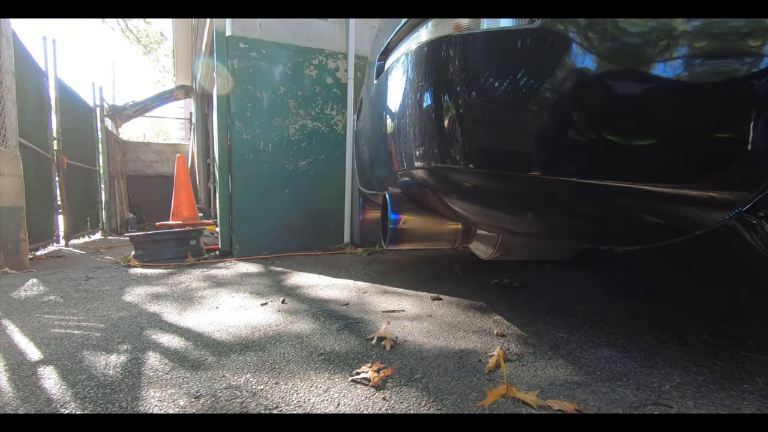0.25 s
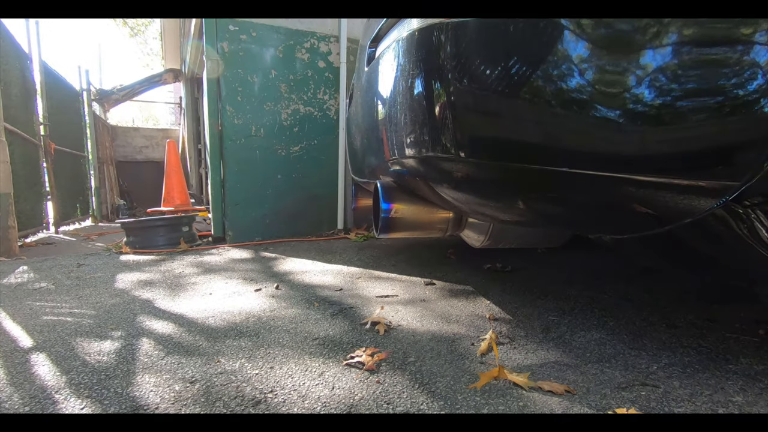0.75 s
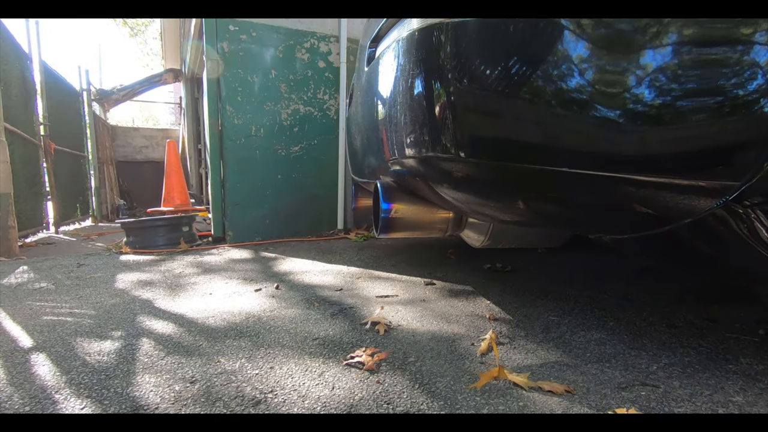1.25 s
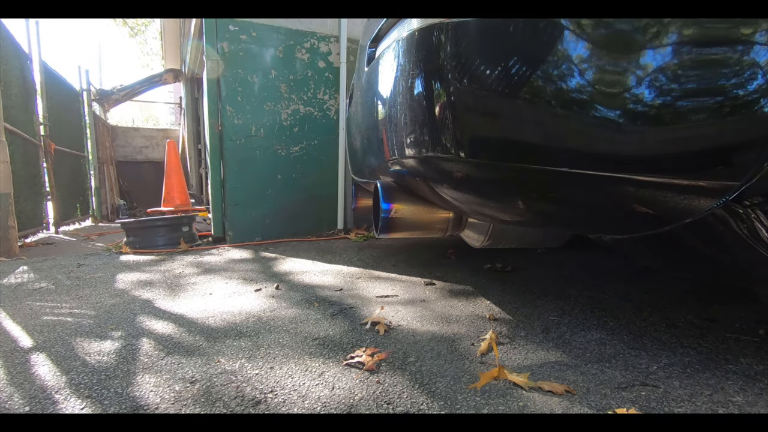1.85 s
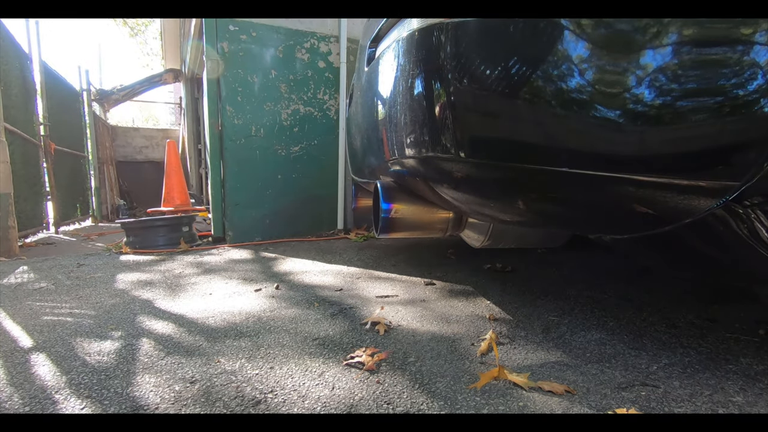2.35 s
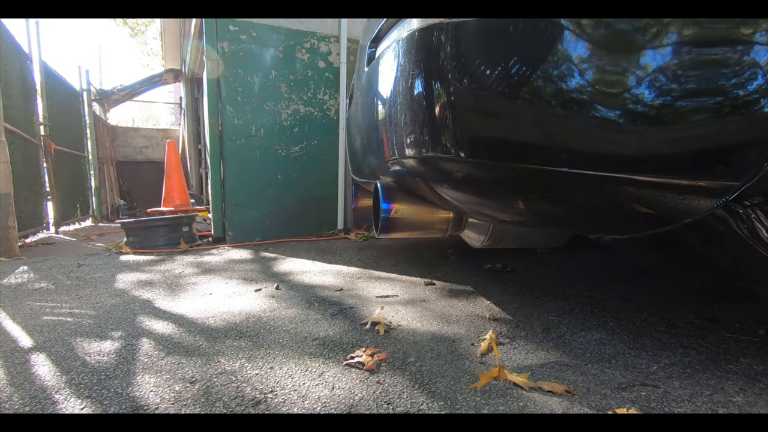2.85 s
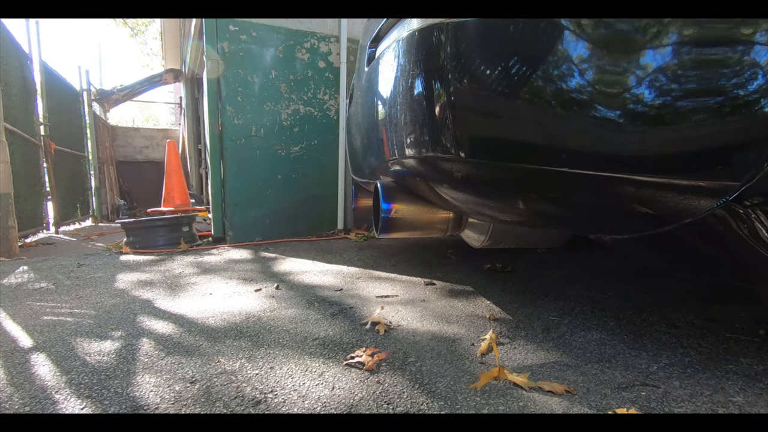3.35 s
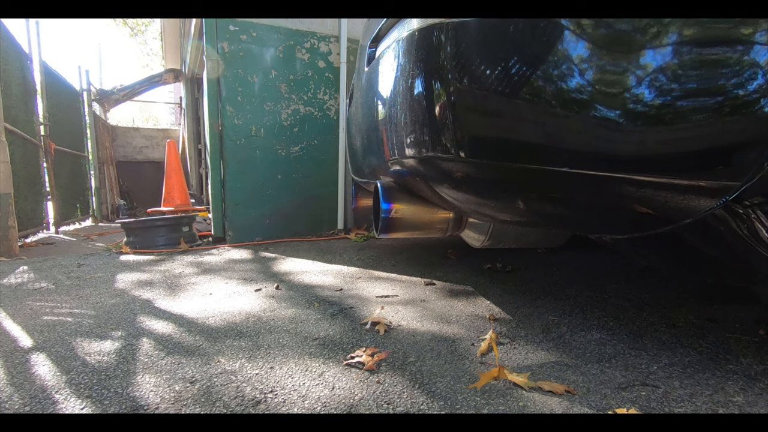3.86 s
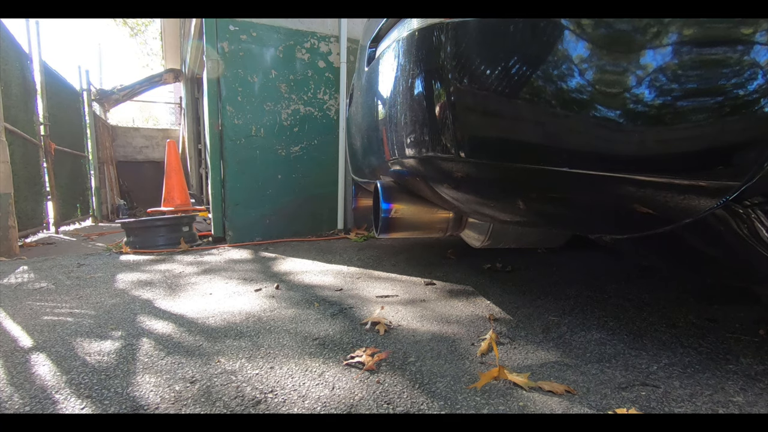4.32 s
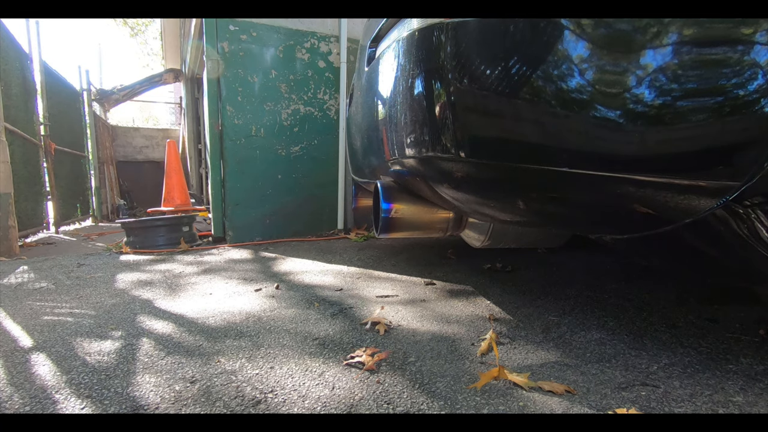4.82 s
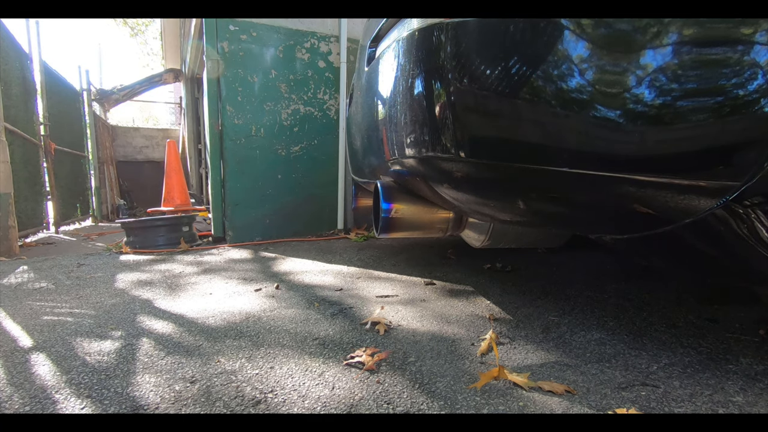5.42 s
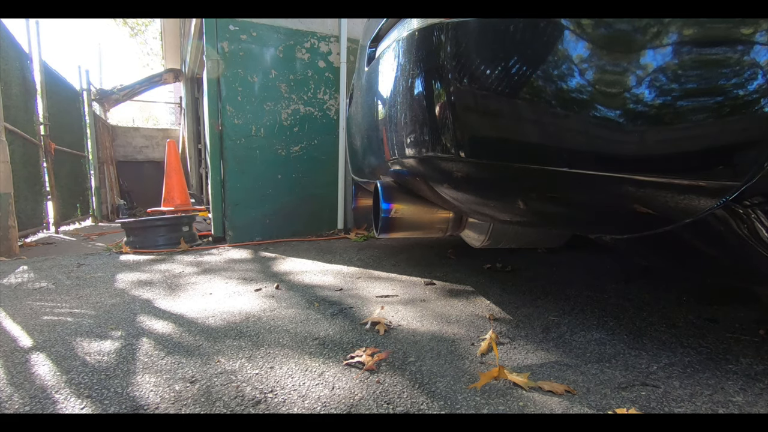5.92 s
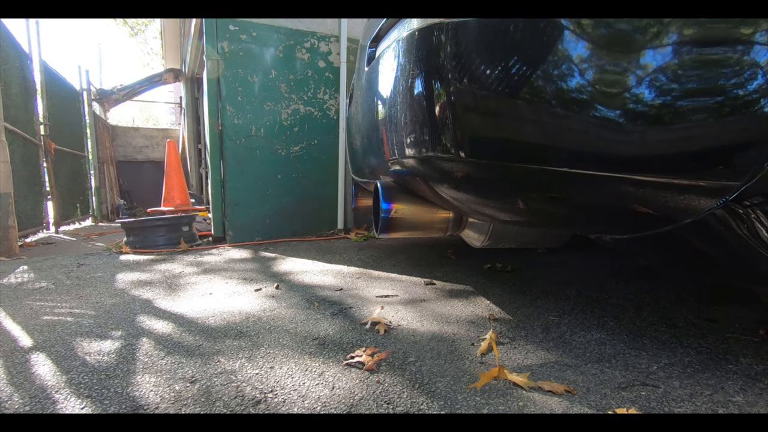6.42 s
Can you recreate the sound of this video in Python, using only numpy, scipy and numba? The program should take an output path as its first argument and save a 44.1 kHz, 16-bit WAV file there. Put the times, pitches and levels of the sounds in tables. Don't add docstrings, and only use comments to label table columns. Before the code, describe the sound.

After quiet road rumble, a cold car cranks briefly, fires with a thump and idles fast and uneven, heard right beside the tailpipe.

```python
import sys
import numpy as np
from scipy import signal
from scipy.fft import rfft, irfft, next_fast_len
from scipy.io import wavfile
from scipy.ndimage import uniform_filter1d
from numba import njit

SR = 44100
rng = np.random.default_rng(int(sys.argv[2]) if len(sys.argv) > 2 else 0)


def gain_from_decibels(decibels):
    exponent = np.asarray(decibels, float) / 20
    return 10 ** exponent


def generate_wav(signal):
    frames = np.transpose(np.atleast_2d(signal))
    scaled = np.clip(frames, -1, 1) * 32767
    pcm = np.round(scaled).astype(np.int16)
    wavfile.write(sys.argv[1], SR, pcm)


N = 294588
T = np.arange(N) / SR
HZ = np.fft.rfftfreq(next_fast_len(N), 1 / SR)

# (frequency [Hz], density [dB/Hz])
WIND_MODE_COLOUR = [(12, -49), (30, -13.5), (106, -3), (150, -9), (200, -15), (235, -17), (300, -16),
                    (767, -15), (1500, -17.5), (2300, -27.5), (3300, -38), (6000, -46.5), (6900, -61),
                    (9500, -78.5)]
STEREO_MODE_COLOUR = [(12, -45), (43, -8), (64, 0.5), (124, -7.5), (216, -17.5), (486, -26.5), (800, -24.5),
                      (1640, -25), (3500, -39), (4300, -48), (6400, -50), (7600, -55.5), (8300, -65.5),
                      (11000, -82.5)]
# (frequency [Hz], density [dB/Hz])
AIR_COLOUR = [(7000, -70), (8800, -30), (10000, -32.5), (13000, -41), (15700, -58)]
# (time [s], level [dB])
DUCK = [(2.45, -4), (2.6, -2), (3.3, -7.5), (3.45, -10.5), (6.68, -14)]
# (frequency [Hz], left minus right [dB])
YARD_BALANCE = [(60, 6.5), (100, 1), (180, 2.5), (310, -1), (530, -1.0), (920, -3.5), (1590, 0.5),
                (2740, 0.5), (4720, 2.5), (8150, 4.5)]
# (frequency [Hz], likeness [0-1])
YARD_LIKENESS = [(60, 1), (120, 0.97), (240, 0.86), (490, 0.73), (990, 0.21), (2000, 0.26), (4040, 0.54),
                 (8150, 0.08)]
# (time [s], depth [dB], half length [s])
LORRIES = [
    (0.48, 6.5, 0.074),
    (1.82, 2, 0.11),
    (1.93, -4.5, 0.044),
    (2.07, 1.5, 0.1),
    (2.363, -2, 0.19),
]
# (time [s], peak [dB], frequency [Hz], t60 [s])
TICKS = [(.705, -57, 7600, .03), (.785, -56, 8050, .0007), (2.497, -26, 2480, 0.018),
         (2.527, -16, 1290, 0.025), (3.37, -15, 63, .25), (3.434, -11.5, 54.3, .3),
         (3.448, -23, 343, 0.078), (3.481, -19, 445, 0.1), (3.452, -16, 201.7, 0.08),
         (3.468, -19, 184, 0.11), (3.486, -10, 212, 0.058), (3.521, -14, 194, 0.057)]
# (frequency [Hz], left minus right [dB])
CAR_BALANCE = [(60, 3.5), (100, 3.5), (180, 4), (310, 2), (530, -3.5), (920, -17), (1590, -18.5),
               (2740, -12.5), (4720, -8.5), (8150, 0)]
# (frequency [Hz], left lead [rad])
CAR_PHASE = [(0, 0), (300, -.1), (600, -.7), (860, -2.8), (1290, -4.4), (1950, -5.4), (3200, -5.5),
             (4480, -6.5), (5050, -8.4), (8350, -9.6)]
# (start [s], length [s], gear noise [dB], motor hum [dB], pumped air [dB])
STROKES = [
    (2.491, 0.092, -32.5, -24, -25),
    (2.691, 0.13, -32.5, -25, -23.5),
    (2.912, 0.079, -32.5, -26, -27.5),
    (3.062, 0.067, -31.5, -27, -26),
    (3.197, 0.061, -31.5, -24, -21),
]
# (time [s], hum [Hz])
MOTOR_HUM = [(2.5, 190.3), (2.62, 184.4), (2.72, 247.6), (2.8, 230.7), (2.86, 207.2), (2.94, 244.3),
             (3.05, 218), (3.12, 253.1), (3.3, 235.3)]
# (frequency [Hz], density [dB/Hz])
STARTER_COLOUR = [(180, -23), (300, 4), (414, -9), (484, -2), (706, -3.5), (1270, -3), (1620, -9.5),
                  (1860, -4), (2200, -10), (3260, -8.5), (4970, -28), (6400, -21), (8600, -36),
                  (11200, -71), (18900, -120)]
# (frequency [Hz], width [Hz], level [dB])
BELL_HOUSING = [(477, 23, 1), (1300, 62, -1.5), (1940, 47, -1.5), (2314, 47, -6.5), (2743, 62, -11),
                (2840, 20, -8), (3166, 50, -6), (3584, 36, -9.5), (4090, 64, -18)]
# (multiple of the hum [1], level against gear noise [dB])
WHINE = [(2, -13), (4, -13), (5.4, -14), (8, -14)]
# (start [s], end [s], frequency [Hz], level [dB])
FREEWHEEL = [
    (3.298, 3.464, 3940, -57),
    (3.52, 3.715, 4100, -57),
]
# (time [s], firings counted [1])
CRANK = [(3.348, -2), (3.516, 4), (3.639, 8), (3.99, 20), (4.356, 32), (4.7, 43), (5.313, 63), (6.155, 91),
         (6.763, 111)]
# (frequency [Hz], density [dB/Hz])
BAY_COLOUR = [(320, -15), (550, -2), (589, -11), (823, -18.5), (966, -10.5), (1150, -13), (1330, -9),
              (1620, -17.5), (1780, -11), (2040, -16), (2750, -12.5), (4310, -24.5), (6380, -16),
              (8600, -27.5), (11200, -63.5), (18900, -120)]
# (frequency [Hz], width [Hz], level [dB])
WHISTLE = [(1304, 39, 0.5), (1366, 54, -1.5), (1310, 180, -4.5)]
# (time [s], level [dB])
DRAUGHT = [(3.3, -49), (3.6, -54), (4.1, -42.5), (5.4, -40.5), (5.8, -46), (6.68, -46)]
# (lateness on the beat [s], size [1], rasp sharpness [dB])
CYLINDERS = [
    (-.0009, 1., 0),
    (-.0009, .97, 0),
    (-.0147, 1., -5),
    (-.0147, .69, -11),
]
STUMBLES = [
    (6, .4),
    (33, .4),
    (37, .5),
]
# (frequency [Hz], width [Hz], long-header gain [1], short-header gain [1])
PIPE_MODES = [(36.8, 19.3, -.92, -2.07), (59.5, 8., 2.29, 2.94), (80.8, 15.3, 6.42, 4.64),
              (101.5, 8., -6.55, -9.49), (131.4, 10.8, -1.05, -.47), (156.5, 8., -2.65, -1.21),
              (186.8, 16.3, .08, .79), (222.1, 8., 1.06, .48)]
# (frequency [Hz], width [Hz], level [dB])
SILENCER_MODES = [(167.3, 29.3, -2), (207.5, 21.5, 5), (329.4, 23.8, -1.5), (391.5, 19.4, 0.5),
                  (461.6, 68, -3)]
# (time [s], depth [dB], half length [s])
CHOKES = [
    (3.593, -15, 0.014),
    (3.942, -2, 0.017),
    (4.388, -4, 0.012),
    (4.516, -11.5, 0.018),
]

SWITCH_S = .785
WASH_DB, WASH_RISE_DB_S, NEAR_WASH_DB = -42.5, 6.5, -35.5
RUMBLE_DB, LEAVES_DB, NEAR_LEAVES_DB = 10, -57, -55
RUSTLE_S, RUSTLE_LENGTH_S, RUSTLE_DB = 0.14, .17, 5

COAST_GEAR_DB, COAST_HUM_DB, COAST_AIR_DB = -42, -35, -29
STRAIN_DB, STRAIN_UNTIL_S, STRAIN_FADES_S = 3.5, 2.72, .06
SPIN_UP_DB, SPIN_UP_S = -17.5, .035
BITE_S, EASE_S, HUM_BUILDS_S, HUM_EASES_S = 0.0014, 0.054, 0.033, .045
AIR_LAG_S, AIR_HALF_S = .02, 0.048
SIZZLE_DB, SIZZLE_FOLLOWS, CLASH_DB, CLASH_FADES_S = -48.5, .35, 10, .04
RELEASE_S, RELEASE_DB, RELEASE_HALF_S = 4.3, -31.5, .08

BAY_DB, WARMING_DB_S = -46.3, -0.76
OIL_FROM_S, OIL_ARRIVES_S, DRY_CLATTER_DB, DRY_TOP_DB = 3.47, .17, 10.5, 1.5
BANG_DUCK_DB, DUCK_S, DUCK_HALF_S = -3.5, 3.515, .03

STRONG_PAIR_MOVES = 34
BOOM_DB, RASP_DB = -15, -36
CATCH_S, SURGE_DB, SURGE_FADES_S = 3.37, 0.5, .4
FLARE_S, FLARE_DB, FLARE_HALF_S = 3.2, 16.5, 0.047


def unit(x):
    return x / np.sqrt(np.mean(x ** 2))


def columns(table):
    s, *rest = np.transpose(table)
    return [np.interp(T, s, c) for c in rest]


def over_hz(table, hz):
    f, v = np.transpose(table)
    return np.interp(np.log(hz + 1), np.log(f + 1), v)


def bump(at_s, half_s):
    return np.exp(-((T - at_s) / half_s) ** 2)


def swell(start_s, length_s, attack_s, release_s):
    rise = (T - start_s) / attack_s
    fall = 1 + (start_s + length_s - T) / release_s
    return np.clip(np.minimum(rise, fall), 0, 1)


def fading(start_s, fades_s):
    return np.exp(-np.maximum(T - start_s, 0) / fades_s)


def walk(rate_hz):
    k = int(SR / rate_hz)
    held = np.repeat(rng.standard_normal(N // k + 1), k)
    return 0.93 * uniform_filter1d(uniform_filter1d(held, k), k)[:N]


def through(x, gain):
    size = next_fast_len(N)
    return irfft(rfft(x, size) * gain, size)[:N]


def band(x, lo_hz, hi_hz):
    def below(hz):
        return 1 / (1 + (HZ / hz) ** 8)
    return through(x, below(hi_hz) - below(lo_hz))


@njit
def svf(x, hz, width):
    y, b, l = np.empty(len(x)), 0., 0.
    for i in range(len(x)):
        g = np.pi * hz[i] * (1 + (np.pi * hz[i]) ** 2 / 3)
        k = width / hz[i]
        v = (b + g * (x[i] - l)) / (1 + g * (g + k))
        b, l, y[i] = 2 * v - b, l + 2 * g * v, k * v
    return y


def ring(x, hz, width_hz):
    return svf(x, np.zeros(N) + hz / SR, width_hz / SR)


def coloured(colour, flicker_db, rate_hz, air_db):
    shape_db = np.maximum(over_hz(colour, HZ), over_hz(AIR_COLOUR, HZ) + air_db)
    x = through(rng.standard_normal(N), gain_from_decibels(shape_db))
    octaves_hz = 15 * 2. ** np.arange(11)
    return sum(band(x, hz, 2 * hz) * gain_from_decibels(flicker_db * walk(rate_hz)) for hz in octaves_hz)


def layered(x, edges_hz, reference_hz, curves_db):
    out = 0
    for lo, hi, reference, db in zip(edges_hz, edges_hz[1:], reference_hz, curves_db):
        out = out + band(x, lo, hi) * gain_from_decibels(db) / band(x, *reference).std()
    return out


def ports(x, balance, lead_rad):
    half = gain_from_decibels(over_hz(balance, HZ) / 2) * np.exp(.5j * lead_rad)
    return np.array([through(x, half), through(x, 1 / half)])


def road():
    mono = T < SWITCH_S
    wash_db = np.where(mono, WASH_DB + WASH_RISE_DB_S * T, NEAR_WASH_DB)
    rumble_db = wash_db + RUMBLE_DB + sum(db * bump(s, half) for s, db, half in LORRIES)
    rustle_db = RUSTLE_DB * swell(RUSTLE_S, RUSTLE_LENGTH_S, 0.036, 0.18)
    leaves_db = np.where(mono, LEAVES_DB, NEAR_LEAVES_DB) + rustle_db
    return rumble_db, wash_db, leaves_db


def traffic():
    edges_hz = (10, 300, 3700, 20000)
    reference_hz = ((30, 250), (400, 3000), (4000, 8000))
    parts = edges_hz, reference_hz, road()
    mono = layered(coloured(WIND_MODE_COLOUR, 1.0, 3.5, -62), *parts)
    mid, side = (layered(coloured(STEREO_MODE_COLOUR, 0.32, 6.4, -41), *parts) for _ in range(2))
    like = np.clip(over_hz(YARD_LIKENESS, HZ), 0, .995)
    side = through(side, np.sqrt((1 - like) / (1 + like)))
    wide = ports(mid, YARD_BALANCE, 0) + side * np.array([[1], [-1]])
    return np.where(T < SWITCH_S, mono, wide) * gain_from_decibels(columns(DUCK)[0])


def ticks():
    out = np.zeros(N)
    for s, db, hz, t60_s in TICKS:
        t = np.maximum(T - s, 0)
        out -= gain_from_decibels(db - 60 * t / t60_s) * np.sin(2 * np.pi * hz * t)
    return out


def yard(x, t60_s, wet_db):
    t = np.arange(int(.2 * SR)) / SR
    decay = gain_from_decibels(-60 * t / t60_s) / np.sqrt(t60_s * SR / np.log(1e6))
    tails = rng.standard_normal((2, 2, len(t))) * decay
    treble = band(x, 576, 20000)
    out = []
    for one, other in tails:
        turn_rad = np.cumsum(walk(18)) * 200 / SR
        first = signal.fftconvolve(treble, one)[:N]
        second = signal.fftconvolve(treble, other)[:N]
        out.append(np.cos(turn_rad) * first + np.sin(turn_rad) * second)
    return gain_from_decibels(wet_db) * np.array(out)


def effort():
    start_s = STROKES[0][0]
    coast_db = COAST_GEAR_DB + STRAIN_DB * fading(STRAIN_UNTIL_S, STRAIN_FADES_S)
    gear_db = coast_db
    hum_db = COAST_HUM_DB + SPIN_UP_DB * fading(start_s, SPIN_UP_S)
    air_db = COAST_AIR_DB
    for s, length, gear, hum, air in STROKES:
        gear_db = gear_db + (gear - coast_db) * swell(s, length, BITE_S, EASE_S)
        hum_db = hum_db + (hum - COAST_HUM_DB) * swell(s, length, HUM_BUILDS_S, HUM_EASES_S)
        air_db = air_db + (air - COAST_AIR_DB) * bump(s + length + AIR_LAG_S, AIR_HALF_S)
    top_db = SIZZLE_DB + SIZZLE_FOLLOWS * (gear_db - COAST_GEAR_DB)
    top_db = top_db + CLASH_DB * fading(start_s + 0.042, CLASH_FADES_S)
    top_db = top_db + (RELEASE_DB - top_db) * bump(RELEASE_S, RELEASE_HALF_S)
    return gear_db, hum_db, air_db, top_db


def starter():
    gear_db, hum_db, air_db, top_db = effort()
    hum_hz, = columns(MOTOR_HUM)
    teeth = gain_from_decibels(2.5 * np.cos(2 * np.pi * np.cumsum(hum_hz) / SR) + 1.2 * walk(90))
    grind = unit(coloured(STARTER_COLOUR, .5, 25, -13))
    glide = (hum_hz / 225) ** 0.22
    housing = unit(sum(gain_from_decibels(db) * unit(ring(rng.standard_normal(N), hz * glide, w))
                       for hz, w, db in BELL_HOUSING))
    grind += 0.63 * band(housing, 300, 4300)
    gears = layered(grind * teeth, (300, 4600, 20000), ((800, 4000), (5000, 9000)), (gear_db, top_db))

    hum = unit(ring(rng.standard_normal(N), hum_hz, 14))
    hum = hum + .5 * unit(ring(rng.standard_normal(N), 163, 79))
    air = unit(band(rng.standard_normal(N), 30, 99))
    turns = np.cumsum(hum_hz * (1 + 0.0082 * walk(40))) / SR
    whine = sum(gain_from_decibels(db + 2.5 * walk(23)) * np.sin(2 * np.pi * k * turns) for k, db in WHINE)

    cranking = np.clip((3.36 - T) / 0.017, 0, 1)
    driven = unit(hum) * gain_from_decibels(hum_db) + air * gain_from_decibels(air_db + 0.5) + whine * gain_from_decibels(gear_db)
    out = gears * np.clip((3.66 - T) / 0.15, 0, 1) + cranking * driven
    for a, b, hz, db in FREEWHEEL:
        fade = np.clip(np.minimum(T - a, b - T) / .03, 0, 1)
        out += fade * np.sqrt(2) * gain_from_decibels(db) * np.sin(2 * np.pi * hz * T)
    return out * np.clip((T - 2.489) / .005, 0, 1)


def engine_bay():
    s, count = np.transpose(CRANK)
    firings = np.interp(T, s, count) + (T > 4.42)
    bay_db = BAY_DB + WARMING_DB_S * (T - OIL_FROM_S)
    bay_db = bay_db + DRY_CLATTER_DB * fading(OIL_FROM_S, OIL_ARRIVES_S)
    bay_db = bay_db + BANG_DUCK_DB * bump(DUCK_S, DUCK_HALF_S)
    throb_db = 0.26 * np.cos(2 * np.pi * firings) + 0.28 * walk(6)
    hiss = coloured(BAY_COLOUR, 0.2, 13, 0) * gain_from_decibels(throb_db)
    dry_top = gain_from_decibels(DRY_TOP_DB * fading(OIL_FROM_S + 0.11, .1)) - 1
    hiss = hiss + band(hiss, 8300, 20000) * dry_top

    whistle_db, = columns(DRAUGHT)
    cycle = (firings + .55) % 4 / 4
    flow = gain_from_decibels(-11 * uniform_filter1d(cycle ** 2, size=200) + 1.2 * walk(40))
    waver = 1 + 0.0038 * walk(21)
    whistle = flow * sum(gain_from_decibels(db) * unit(ring(rng.standard_normal(N), hz * waver, w))
                         for hz, w, db in WHISTLE)
    fade_in = np.clip((T - 3.26) / 0.061, 0, 1)
    hiss = hiss / band(hiss, 850, 13000).std() * gain_from_decibels(bay_db)
    return fade_in * (hiss + unit(whistle) * gain_from_decibels(whistle_db - 9))


def exhaust():
    s, count = np.transpose(CRANK)
    n = np.arange(-2, 108)
    cylinder = (n + (n >= STRONG_PAIR_MOVES)) % 4
    late_s, size, sharp_db = np.array(CYLINDERS)[cylinder].T
    chance = rng.standard_normal((len(n), 3)).T
    size = size * gain_from_decibels(1.0 * chance[0])
    for k, share in STUMBLES:
        size[n == k] *= share
    beat_s = np.interp(n, count, s)

    headers = np.zeros((2, N))
    arrival_s = beat_s + late_s + .0003 * chance[1]
    headers[cylinder // 2, (arrival_s * SR).astype(int)] = size
    boom = sum(ring(a * headers[0] + b * headers[1], hz, w) for hz, w, a, b in PIPE_MODES)
    boom = band(boom, 20, 290)
    for at, depth_db, half in CHOKES:
        boom *= gain_from_decibels(depth_db * bump(at, half))

    puffs = np.zeros(N)
    puffs[((beat_s + .002) * SR).astype(int)] = size * gain_from_decibels(sharp_db + 0.33 * chance[2])
    puff = signal.lfilter([1], [1, -np.exp(-1 / (.014 * SR))], puffs)
    puff = uniform_filter1d(puff, size=int(0.0053 * SR))
    gas = puff * rng.standard_normal(N) - 17 * puffs
    rasp = sum((-1) ** k * gain_from_decibels(db) * ring(gas, hz, w) for k, (hz, w, db) in enumerate(SILENCER_MODES))
    rasp = band(rasp, 79, 465)

    boom_db = BOOM_DB + SURGE_DB * fading(CATCH_S, SURGE_FADES_S)
    rasp_db = RASP_DB + FLARE_DB * bump(FLARE_S, FLARE_HALF_S)
    steady = T > 4.6
    boom = boom / boom[steady].std() * gain_from_decibels(boom_db)
    rasp = rasp / band(rasp, 262, 520)[steady].std() * gain_from_decibels(rasp_db)
    return (T > s[0] - .02) * (boom + rasp)


def scene():
    car = exhaust() + engine_bay() + starter()
    near = ports(car, CAR_BALANCE, over_hz(CAR_PHASE, HZ)) * (T > 2.4)
    return near + yard(car, .04, 1.5) + ticks() + traffic()


def roll_off(x):
    return signal.sosfilt(signal.butter(12, 15720, fs=SR, output="sos"), x)


def record(dry):
    mix = np.tanh(.8 * dry) / .8
    return roll_off(mix)


dry = scene()
out = record(dry)
generate_wav(out)
```